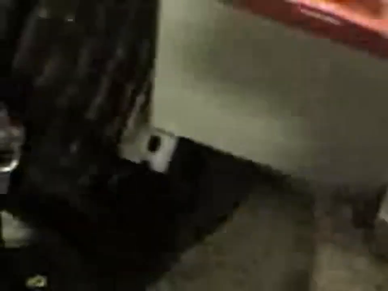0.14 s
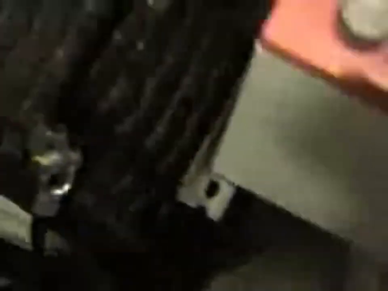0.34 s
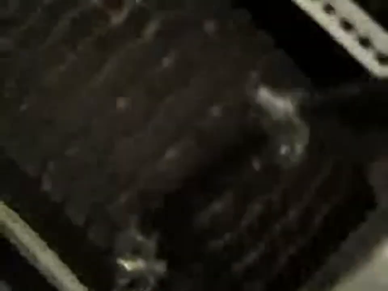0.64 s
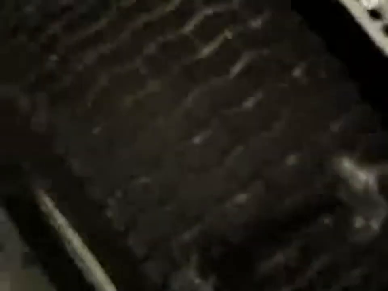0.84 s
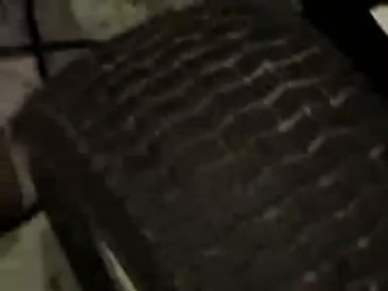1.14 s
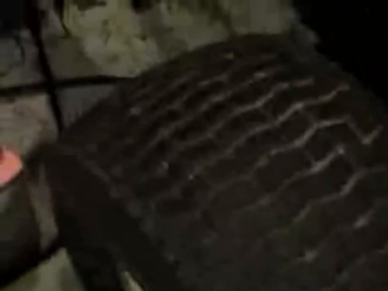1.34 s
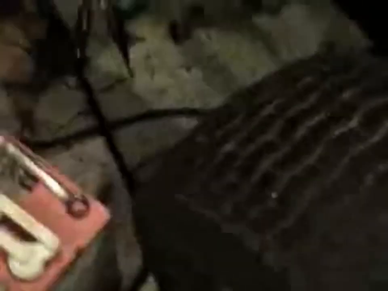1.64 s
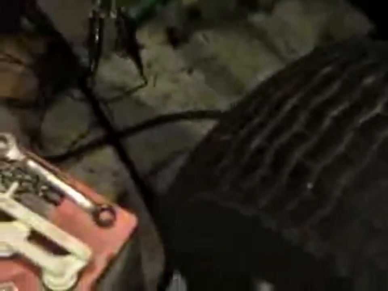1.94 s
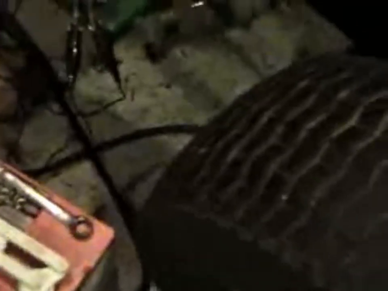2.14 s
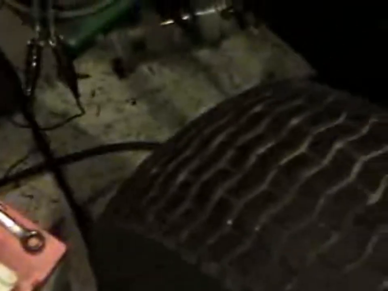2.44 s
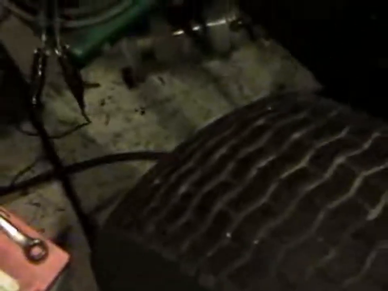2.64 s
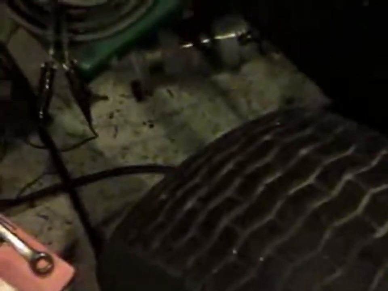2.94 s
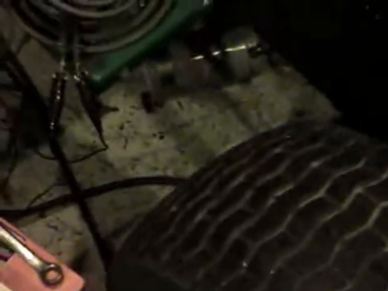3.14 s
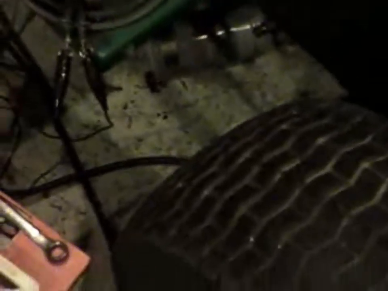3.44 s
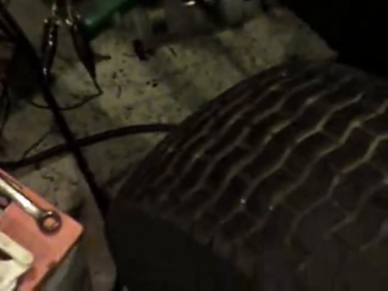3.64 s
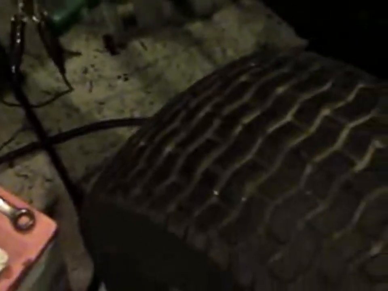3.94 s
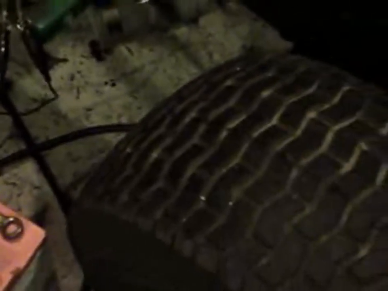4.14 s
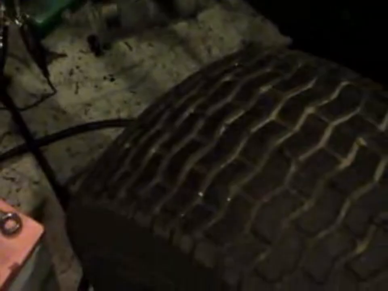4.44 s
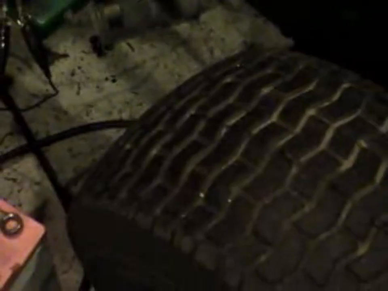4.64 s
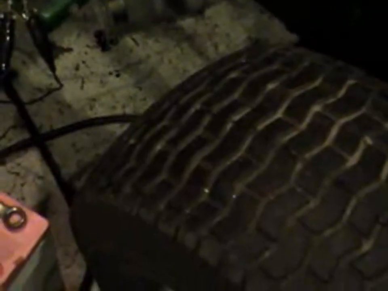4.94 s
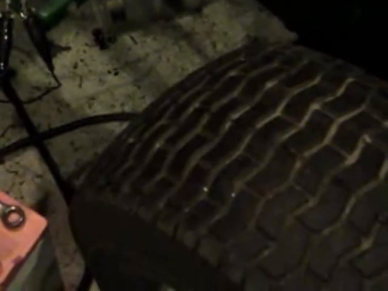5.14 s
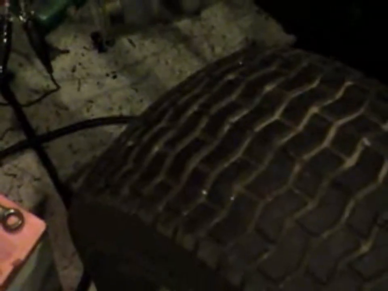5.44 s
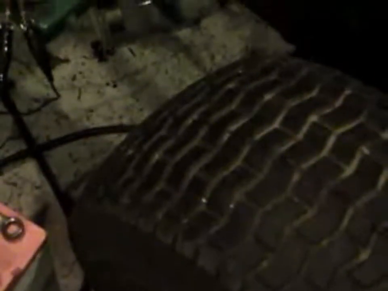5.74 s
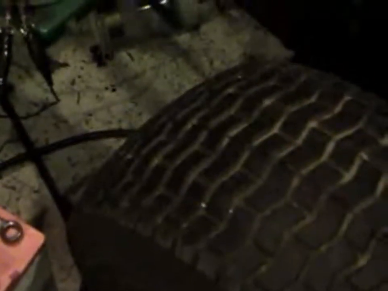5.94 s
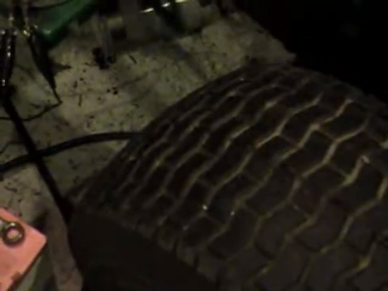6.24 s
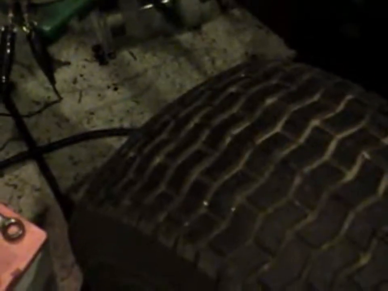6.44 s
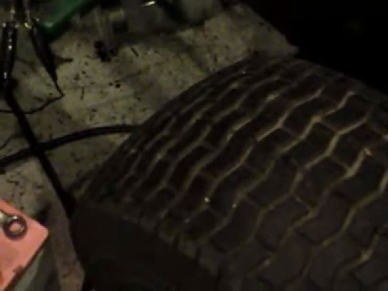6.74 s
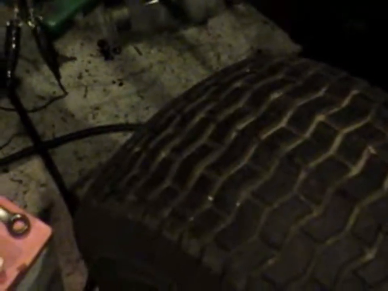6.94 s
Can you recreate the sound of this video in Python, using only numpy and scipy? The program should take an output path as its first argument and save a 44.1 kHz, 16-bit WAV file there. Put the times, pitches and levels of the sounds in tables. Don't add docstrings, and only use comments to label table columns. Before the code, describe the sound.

Steady geared motor whir in a quiet workshop, hum and brush hiss mixed with rapid clatter, dull jolts, panel rattles and faint bearing squeaks.

```python
import sys
import numpy as np
from scipy import signal
from scipy.fft import rfft, irfft, dct, next_fast_len
from scipy.io import wavfile
from scipy.ndimage import uniform_filter1d

SR = 44100
rng = np.random.default_rng(int(sys.argv[2]) if len(sys.argv) > 2 else 0)


def attenuation_scalar(level_db):
    decades = np.asarray(level_db, float) / 20
    return 10 ** decades


def output_pcm(signal):
    pcm = np.clip(np.atleast_2d(signal).T, -1, 1) * 32767
    wavfile.write(sys.argv[1], SR, np.round(pcm).astype(np.int16))


N = 313401

# order [cycles/turn], level/dB rms
MESH_ORDERS = [(19, -68), (20, -77), (21, -72), (29, -68), (30, -71.5), (35, -66.5), (37, -63), (38, -65),
               (43, -66), (54, -58), (71, -68.5), (80, -52), (81, -59.5), (82, -61.5), (84, -60),
               (120, -70.5), (121, -64.5), (123, -72.5), (124, -62.5), (160, -63)]
# order [cycles/turn], level/dB rms, gain [dB/s], wobble [rad],
# wobble place [turn], twice-a-turn swell [0-1], swell place [turn]
STRONG_ORDERS = [(40, -55.5, .75, .45, .15, .3, .07), (60, -39.5, -.45, .5, .12, .3, .335),
                 (100, -50, .1, .45, .2, .3, .1)]
# t/s, level/dB
TOOTH_LOAD = [(0, 0), (.9, 1), (1.1, 2), (1.9, 2.5), (2.2, 0), (3.4, 1), (4.4, 3.5), (4.7, 0.5), (5.3, 3),
              (6.1, 2), (6.4, -0.5), (7.11, 1.5)]
# place [turn], blow level/dB
WORN_TEETH = [(.0, -6), (.125, -3), (.165, 0), (.25, -6), (.33, -7), (.43, -4), (.515, 2), (.6, -5),
              (.68, -6), (.745, 4), (.785, 0), (.85, 1), (.91, 0)]
# f/Hz, level/dB, t60/s
CASING_MODES = [(1079, -45, 0.13), (1057, -43.5, 0.13), (1299, -48, 0.11), (965, -48, 0.055),
                (1920, -51.5, 0.08), (533, -38.5, 0.11), (504, -43.5, 0.083)]
# f/Hz, level [dB/Hz]
NOISE_SPECTRUM = [(25, -51.5), (60, -25), (110, -21.5), (160, -16.5), (300, -8), (450, -6.5), (620, -9.5),
                  (900, -10), (1500, -13), (2200, -24), (3200, -28.5), (4000, -33), (5000, -37.5),
                  (7400, -40.5)]
# f/Hz, width/Hz, lift/dB
FRAME_MODES = [(369.8, 59, 6), (280.2, 60, 4), (469, 16, 3.5), (535, 16, 10.5), (510, 30, 4.5),
               (749.4, 28, -4), (1086.5, 45, 3.5), (860.4, 85, -9), (391.2, 26, -6.5), (575, 37, -2.5),
               (1282, 180, -2), (5350, 160, 11), (1699, 200, -5), (2008, 120, 3), (1128, 37, -2.5),
               (1043, 40, 2.5), (1245, 60, -3.5), (919, 17, -1.5), (3514, 29, -1.5), (3870, 29, 4),
               (4280, 33, 3.5)]
# f/Hz, level/dB
PANELS = [(1195, -51.5), (1480, -47), (1640, -50.5), (1905, -48.5), (2120, -53), (2600, -58), (3200, -59),
          (4740, -64)]
# t/s, level/dB
HAND_TREMOR = [
    (0, -60),
    (1.2, -70),
    (4.6, -67.5),
    (4.8, -78),
    (7.11, -88),
]
# t/s, peak level/dB, casing f/Hz
BEARING_JOLTS = [(0.145, -30, 530), (0.433, -23.5, 522), (0.772, -37.5, 530), (0.879, -29.5, 468),
                 (1.266, -36, 465), (1.325, -37, 543), (1.488, -41, 533), (1.613, -38, 560),
                 (1.827, -41, 446), (2.0, -31, 440), (2.072, -30, 516), (2.211, -37, 476),
                 (2.462, -26, 469), (2.546, -31.5, 537), (2.757, -55, 560), (3.101, -34, 470),
                 (3.195, -29, 475), (3.28, -33.5, 486), (3.338, -26, 471), (3.402, -28, 496),
                 (3.771, -33, 469), (3.812, -25, 503), (4.011, -36.5, 520), (4.078, -26, 447),
                 (4.123, -26.5, 524.5), (4.311, -34, 537), (4.362, -27.5, 483), (4.41, -33, 527),
                 (4.47, -26, 472), (3.46, -28, 541), (3.52, -28, 534.5), (4.542, -27.5, 525),
                 (4.701, -33, 477), (4.809, -31, 525), (4.87, -27, 512), (4.976, -31, 537),
                 (5.046, -27, 514), (5.124, -45, 560), (5.256, -27, 500), (5.379, -26, 533),
                 (5.42, -32.5, 533), (5.862, -30, 487), (5.988, -36, 503), (5.913, -30, 540),
                 (6.066, -27.5, 544), (6.102, -28.5, 510), (6.14, -27.5, 535), (6.229, -30.5, 473),
                 (6.271, -29, 496), (6.41, -29.5, 534), (6.507, -26, 527), (6.353, -30.5, 569),
                 (6.61, -31, 509), (6.657, -34, 533), (6.736, -31.5, 474), (6.866, -31, 486)]
# t/s, peak level/dB, f/Hz
SHARP_JOLTS = [
    (0.143, -29, 547),
    (0.770, -26, 566),
    (0.884, -29.5, 466),
    (6.1, -28, 524),
    (6.656, -27, 539),
]
# t/s, peak level/dB, f/Hz
PALM_PRESSES = [
    (.36, -50, 63.9),
    (3.46, -56, 61.7),
    (5.54, -62, 67),
]
# t/s, peak level/dB, f/Hz
HAND_BUMPS = [(0.153, -50, 51.1), (0.308, -63, 64.6), (0.684, -49, 53.8), (0.881, -58.5, 88.8),
              (1.047, -53.5, 75.4), (1.454, -58, 75.4), (1.776, -58.5, 64.6), (1.899, -48, 88.8),
              (2.029, -56.5, 78.1), (2.382, -54, 80.7), (2.513, -52, 53.8), (2.664, -55, 88.8),
              (2.77, -58, 56.5), (2.924, -55, 80.7), (3.186, -54.5, 67.3), (3.326, -55.5, 88.8),
              (3.735, -55.5, 80.7), (3.916, -54.5, 64.6), (4.079, -53.5, 80.7), (4.174, -60, 88.8),
              (4.464, -56, 59.2), (4.583, -55, 88.8), (5.52, -59, 86.1), (6.282, -64, 56.5)]
# t/s, peak level/dB
PANEL_TICKS = [(0.173, -44), (0.414, -31), (0.5442, -43), (0.732, -37.5), (0.8975, -33.5), (1.0217, -28.5),
               (1.2226, -43), (1.48, -25.5), (1.541, -35.5), (2.09, -24.5), (2.4495, -37.5), (2.6676, -34),
               (2.7407, -39.5), (3.52, -34), (3.6783, -28), (3.742, -31.5), (3.9053, -33.5), (5.255, -37),
               (5.4115, -31), (5.876, -34), (6.1224, -37.5), (6.2056, -30.5), (6.4635, -30),
               (6.6268, -35.5), (6.9434, -34)]
# t/s, peak level/dB, f/Hz
CASING_CLANGS = [(0.2477, -41, 1035), (0.2982, -39, 1080), (0.3467, -44, 1108), (0.4877, -42, 1055),
                 (0.581, -40, 1027), (0.6414, -35, 1077), (0.7872, -35.5, 1075), (1.0171, -37.5, 1072),
                 (1.1202, -39, 1080), (1.315, -33, 1070), (1.3896, -33.5, 1062), (1.5271, -37.5, 1094),
                 (1.726, -41.5, 1083), (1.7914, -34, 1082), (1.8885, -35, 1064), (1.9616, -35, 1060),
                 (2.13, -34, 1098), (2.2014, -39, 1088), (2.3284, -39, 1064), (2.4, -34, 1085),
                 (2.5099, -30.5, 1054), (2.5771, -36.5, 1080), (2.6746, -39, 1074), (2.8469, -34, 1062),
                 (2.9774, -37, 1065), (3.067, -38, 1100), (3.1857, -36.5, 1070), (3.237, -43, 1024),
                 (3.3539, -32.5, 1071), (3.4854, -37.5, 1093), (3.5755, -37, 1028), (3.6566, -36, 1070),
                 (3.7535, -44, 1087), (3.8116, -45, 1032), (4.1653, -35, 1047), (4.3693, -37.5, 1060),
                 (4.441, -39, 1065), (4.5016, -33.5, 1066), (4.6728, -38, 1061), (4.8779, -36.5, 1073),
                 (5.0974, -43, 1090), (5.2144, -32.5, 1075), (5.3475, -39, 1063), (5.4986, -42, 1050),
                 (5.5513, -34, 1057), (5.7215, -33.5, 1070), (5.7665, -39, 1075), (5.8549, -31, 1062),
                 (5.9613, -38, 1050), (6.0222, -37, 1067), (6.0983, -35, 1092), (6.2978, -39, 1036),
                 (6.3605, -37, 1070), (6.448, -40, 1106), (6.6039, -39, 1080), (6.773, -35.5, 1092),
                 (6.9017, -33, 1053), (7.0698, -34.5, 1082)]
# t/s, peak level/dB, length/s
FINGER_SCUFFS = [
    (0.566, -39, 0.04),
    (1.005, -41, 0.01),
    (3.759, -44, 0.022),
    (6.1, -46, 0.012),
    (6.486, -40.5, 0.039),
]
# t/s, peak level/dB, f/Hz, length/s
BEARING_SQUEAKS = [(0.602, -57, 6130, 0.031), (2.393, -60, 5960, 0.027), (2.425, -47.5, 6200, 0.073),
                   (4.096, -43, 6260, 0.048), (4.127, -55.5, 6230, 0.07), (4.428, -49, 6280, 0.025),
                   (4.465, -57, 6230, 0.03), (4.603, -52, 6060, 0.024), (4.668, -61, 6130, 0.016),
                   (5.106, -50.5, 6170, 0.028), (5.856, -67, 6210, 0.031), (1.14, -60, 4570, 0.035),
                   (3.015, -60, 4760, 0.039), (4.021, -57, 4740, 0.037), (4.29, -64, 4730, 0.044),
                   (4.881, -61, 4720, 0.027), (5.24, -62.5, 4800, 0.035)]
# f/Hz, level/dB
ROUNDING_STEP = [(20, -30), (230, -28.5), (480, -26), (760, -30), (850, -27.5), (950, -31.5), (1600, -33),
                 (2050, -36.5), (2650, -39), (3150, -39.5), (3600, -40.3), (4300, -44), (7300, -46)]
NOISE_FILL_EDGES = [256, 282, 339, 410, 466]

START_TURNS_PER_S, GAIN_TURNS_PER_S2 = 5.8657, .0104
NOISE_DB = -36
SWING_S, SHADE_DB, HUM_SHADE_SHARE = 0.44, -4, 0.12
EASE_FROM_S, EASE_DB_PER_S = 1.7, -0.02
PRESS_S, BUMP_S, BUMP_DB = 0.12, .034, -2.5
TICK_DB = -17
FLECKS_FROM_S, FLECKS_PER_S = 5.0, .45
FRAME_SAMPLES, LEAD_SAMPLES = 512, 414
STEP_DB, COARSE_FROM_S, COARSE_DB_PER_S = -1.3, 5.0, 1.2


def rms_one(x):
    return x / np.sqrt(np.mean(x ** 2) + 1e-20)


def after(start_s):
    return np.maximum(np.arange(N) / SR - start_s, 0)


def in_time(rows):
    t_s, value = np.transpose(rows)
    return np.interp(np.arange(N) / SR, t_s, value)


def at_hz(points, hz):
    f_hz, level_db = np.transpose(points)
    return np.interp(np.log(hz + 1), np.log(f_hz), level_db)


def drift(rate_hz):
    r = np.exp(-80 * np.pi * rate_hz / SR)
    slow = signal.lfilter([1], [1, -2 * r, r * r], rng.standard_normal(N // 40 + 2002))[2000:]
    return np.interp(np.arange(N) / 40, np.arange(len(slow)), rms_one(slow))


def ring(clicks, hz, t60_s):
    r, w = attenuation_scalar(-60 / (t60_s * SR)), 2 * np.pi * hz / SR
    return signal.lfilter([0, np.sin(w)], [1, -2 * r * np.cos(w), r * r], clicks + 1e-18)


def band(x, low_hz, high_hz):
    return signal.sosfilt(signal.butter(2, [low_hz, high_hz], "band", fs=SR, output="sos"), x)


def blows(rows, rise_s, t60_s, trim_db, shift_hz):
    out, t = np.zeros(N), np.arange(SR // 5) / SR
    shape = (1 - np.exp(-t / rise_s)) * attenuation_scalar(-60 * t / t60_s)
    shape /= shape.max()
    for s, peak_db, hz in rows:
        i = round(s * SR)
        blow = attenuation_scalar(peak_db + trim_db) * shape * np.sin(2 * np.pi * (hz + shift_hz) * t)
        out[i:i + len(t)] += blow[:N - i]
    return out


def mesh(turns):
    waver = [attenuation_scalar(2.8 * drift(4.0)) for _ in range(3)]
    out = np.zeros(N)
    for k, (order, level_db) in enumerate(MESH_ORDERS):
        phase = 2 * np.pi * round(order) * turns + rng.uniform(0, 2 * np.pi)
        out += np.sqrt(2) * attenuation_scalar(level_db) * waver[k % 3] * np.sin(phase)
    return out


def throb(turns):
    out, load_db = np.zeros(N), in_time(TOOTH_LOAD)
    for order, level_db, gain_db_per_s, wobble_rad, place, swell, swell_place in STRONG_ORDERS:
        size = attenuation_scalar(level_db + gain_db_per_s * after(0) + load_db + 0.53 * drift(3.0))
        size = size * (1 + swell * np.cos(4 * np.pi * (turns - swell_place)))
        wobble = wobble_rad * np.sin(2 * np.pi * (turns - place))
        out += np.sqrt(2) * size * np.sin(2 * np.pi * order * turns + wobble)
    return out


def knocks(turns):
    place, blow_db = np.transpose(WORN_TEETH)
    due = (np.arange(int(turns[-1]) + 1)[:, None] + place).ravel()
    jitter = (2.8 * rng.standard_normal(len(due))).astype(int)
    at = np.clip(np.searchsorted(turns, due) + jitter, 0, N - 1)
    out = np.zeros(N)
    for hz, level_db, t60_s in CASING_MODES:
        clicks = np.zeros(N)
        side = rng.choice([-1, 1], len(place))
        scatter_db = 2.3 * rng.standard_normal(len(due))
        clicks[at] = np.resize(side * attenuation_scalar(blow_db), len(due)) * attenuation_scalar(level_db + scatter_db)
        soft_blow = ring(clicks, hz, .008) * (800 / SR)
        out += ring(soft_blow, hz, t60_s)
    return out


def running_noise(casing_db, upper_db):
    size = next_fast_len(N)
    hz = np.arange(size // 2 + 1) * SR / size
    colour_db = at_hz(NOISE_SPECTRUM, hz)
    for top_hz, width_hz, lift_db in FRAME_MODES:
        colour_db = colour_db + lift_db / (1 + (2 * (hz - top_hz) / width_hz) ** 2)
    shaped = rfft(rng.standard_normal(size)) * attenuation_scalar(colour_db)
    above_body = 1 / (1 + (850 / (hz + 1)) ** 8)
    above_casing = 1 / (1 + (1450 / (hz + 1)) ** 8)
    body = irfft(shaped * (1 - above_body), size)[:N]
    casing = irfft(shaped * (above_body - above_casing), size)[:N]
    upper = irfft(shaped * above_casing, size)[:N]
    return rms_one(body + casing * attenuation_scalar(casing_db) + upper * attenuation_scalar(upper_db + 0.66 * drift(4.1)))


def rattle():
    sizes = attenuation_scalar(3.5 * np.minimum(rng.exponential(1, N), 3.5)) * rng.choice([-1, 1], N)
    born = rng.random(N) < 110 * attenuation_scalar(4.0 * drift(5.0)) / SR
    dealt = rng.integers(0, len(PANELS), N)
    out = np.zeros(N)
    for k, (hz, level_db) in enumerate(PANELS):
        out += attenuation_scalar(level_db) * ring(sizes * born * (dealt == k), hz, 95.0 / hz)
    return out


def handling():
    level_db = in_time(HAND_TREMOR) - 10.0 + 4.7 * drift(4.6)
    return attenuation_scalar(level_db) * rms_one(band(rng.standard_normal(N), 52, 85))


def top_flecks():
    white = rng.standard_normal(N)
    often = drift(13.0) + FLECKS_PER_S * after(FLECKS_FROM_S)
    out = np.zeros(N)
    for low_hz, high_hz, level_db, rarity in [(6500, 7380, -74.5, 0.39), (7500, 7780, -93.0, 1.4),
                                              (7800, 8200, -86.5, 1.5)]:
        gate = np.clip(often + 0.9 * drift(12.0) - rarity, 0, 1)
        scraps = band(band(white, low_hz, high_hz), low_hz, high_hz)
        out += attenuation_scalar(level_db) * gate * rms_one(scraps)
    return out


def raps():
    return blows(SHARP_JOLTS, rise_s=0.0015, t60_s=0.048, trim_db=0.0, shift_hz=0.0)


def jolts():
    return blows(BEARING_JOLTS, rise_s=0.005, t60_s=.12, trim_db=-3.0, shift_hz=3.0)


def presses():
    t = np.arange(N) / SR
    rows = [(*row, PRESS_S) for row in PALM_PRESSES]
    rows += [(s + BUMP_S, peak_db + BUMP_DB, hz, BUMP_S) for s, peak_db, hz in HAND_BUMPS]
    out = np.zeros(N)
    for s, peak_db, hz, length_s in rows:
        out += attenuation_scalar(peak_db) * np.exp(-((t - s) / length_s) ** 2) * np.sin(2 * np.pi * hz * t)
    return out


def ticks():
    t_s, peak_db = np.transpose(PANEL_TICKS)
    at, out = (t_s * SR).astype(int), np.zeros(N)
    for hz, level_db in PANELS:
        clicks = np.zeros(N)
        scatter_db = 3.7 * rng.standard_normal(len(at))
        clicks[at] = attenuation_scalar(peak_db + TICK_DB + .95 * (level_db + 51.5) + scatter_db)
        out += ring(clicks, hz, 90.0 / hz)
    return out


def clangs():
    return blows(CASING_CLANGS, rise_s=0.0071, t60_s=.22, trim_db=-4.5, shift_hz=11.0)


def scuffs():
    level = np.zeros(N)
    for s, peak_db, length_s in FINGER_SCUFFS:
        t = np.arange(int(3 * length_s * SR)) / SR
        shape = np.minimum(t / 0.012, 1) * np.exp(-(t / length_s) ** 2)
        level[round(s * SR):][:len(t)] += attenuation_scalar(peak_db) * shape
    return level * rms_one(band(band(rng.standard_normal(N), 800, 3000), 700, 3500))


def squeaks():
    out, rough = np.zeros(N), drift(190.0)
    for s, peak_db, hz, length_s in BEARING_SQUEAKS:
        i, t = round(s * SR), np.arange(int(length_s * 1.4 * SR)) / SR
        shape = np.minimum(t / 0.0059, 1) * np.exp(-(t / length_s) ** 2 * 2.0)
        cycles = np.cumsum(hz + 45 * rough[i:i + len(t)]) / SR
        out[i:i + len(t)] += attenuation_scalar(peak_db) * shape * np.sin(2 * np.pi * cycles)
    return out


def scene():
    turns = np.cumsum(START_TURNS_PER_S + GAIN_TURNS_PER_S2 * after(0)) / SR
    shade_db = SHADE_DB * np.exp(-after(0) / SWING_S)
    hum_shade_db = HUM_SHADE_SHARE * shade_db
    mesh_db = hum_shade_db + EASE_DB_PER_S * after(EASE_FROM_S) + 1.5
    turn_swell_db = 0.59 * np.cos(2 * np.pi * (turns - .11))
    gear = attenuation_scalar(mesh_db) * mesh(turns) + attenuation_scalar(hum_shade_db) * throb(turns)
    gear += attenuation_scalar(shade_db + 1.1) * knocks(turns)
    noise = attenuation_scalar(NOISE_DB) * running_noise(shade_db + .6, turn_swell_db)
    panels = rattle() + ticks()
    strikes = raps() + jolts() + clangs()
    hand = handling() + presses() + scuffs()
    return (gear + noise + panels + strikes + hand + squeaks())[None]


def camera_rounding(x):
    hop = FRAME_SAMPLES
    x = np.pad(signal.resample_poly(x, 160, 441), (LEAD_SAMPLES, 2 * hop))
    window = np.sin(np.pi * (np.arange(2 * hop) + .5) / 2 / hop)
    frames = np.lib.stride_tricks.sliding_window_view(x, 2 * hop)[::hop] * window
    a, b, c, d = np.split(frames, 4, axis=1)
    lines = dct(np.hstack([-c[:, ::-1] - d, a - b[:, ::-1]]), type=4, norm="ortho")
    count = len(lines)
    chance = rng.uniform(-1, 1, lines.shape)

    usual = attenuation_scalar(at_hz(ROUNDING_STEP, np.arange(hop) * 8000 / hop))
    late_s = np.maximum(np.arange(count) * hop / 16000 - COARSE_FROM_S, 0)
    frame_db = STEP_DB + COARSE_DB_PER_S * late_s + 1.2 * rng.standard_normal(count)
    band_db = np.repeat(2.6 * rng.standard_normal((count, hop // 8)), 8, axis=1)
    step = usual * attenuation_scalar(frame_db[:, None] + band_db)
    rounded = np.round(lines / step * .95) * step + attenuation_scalar(-25) * step * chance

    power = uniform_filter1d(uniform_filter1d(lines ** 2, size=9, axis=1), size=9, axis=1)
    fill = attenuation_scalar(-4.0) * chance * np.sqrt(3 * power)
    for low, high in zip(NOISE_FILL_EDGES, NOISE_FILL_EDGES[1:]):
        quiet = np.max(abs(lines / usual)[:, low + 12:high], axis=1) < .92
        rounded[quiet, low:high] = fill[quiet, low:high]
    rounded[:, NOISE_FILL_EDGES[-1]:] = 0

    first, second = np.split(dct(rounded, type=4, norm="ortho"), 2, axis=1)
    frames = np.hstack([second, -second[:, ::-1], -first[:, ::-1], -first]) * window
    joined = frames[1:, :hop] + frames[:-1, hop:]
    return signal.resample_poly(joined.ravel(), 441, 160)


def top_cut(x):
    return signal.sosfilt(signal.butter(12, 8090, fs=SR, output="sos"), x)


def record(dry):
    early = round((FRAME_SAMPLES - LEAD_SAMPLES) * SR / 16000)
    x = np.concatenate([dry[0, :early], camera_rounding(dry[0])])[:N]
    mix = (x + top_flecks())[None]
    return top_cut(mix)


dry = scene()
out = record(dry)
output_pcm(out)
```